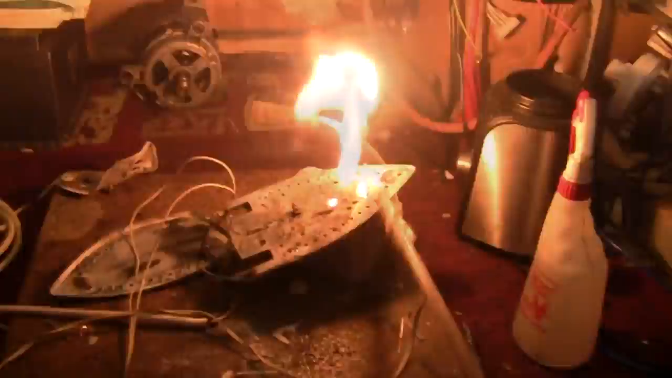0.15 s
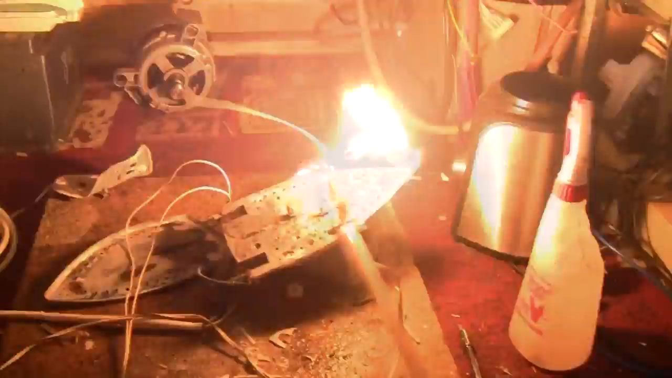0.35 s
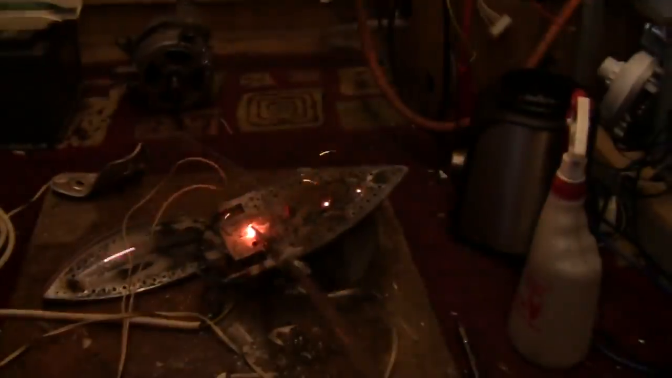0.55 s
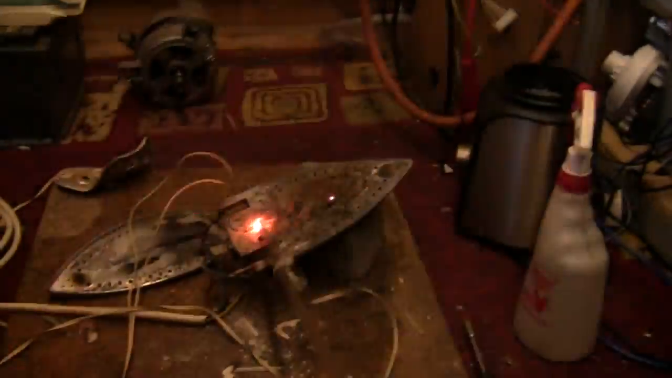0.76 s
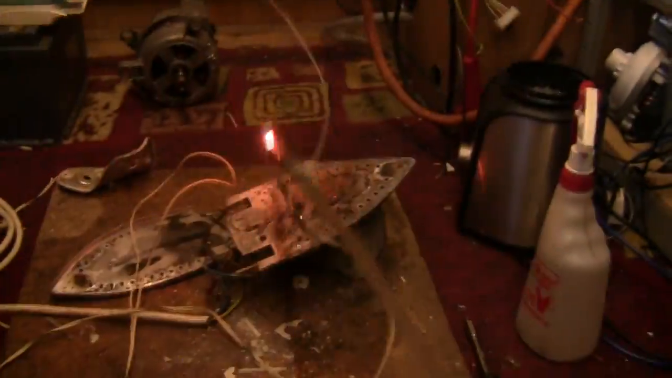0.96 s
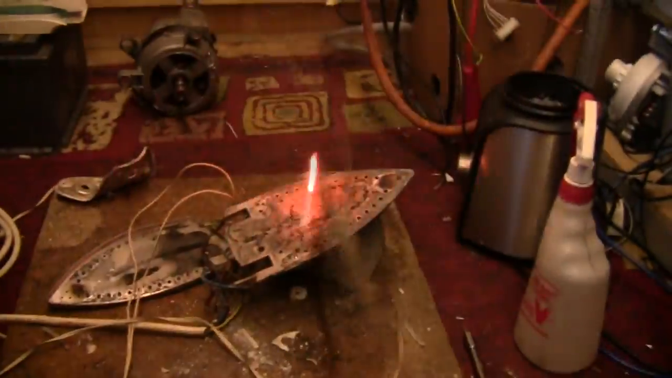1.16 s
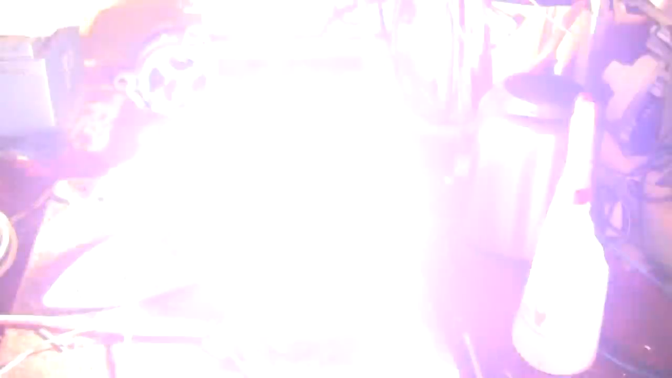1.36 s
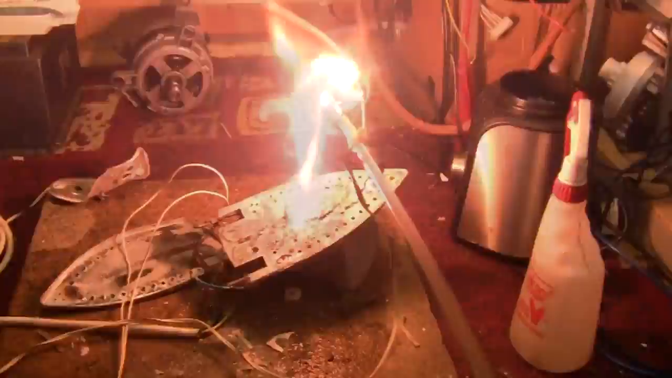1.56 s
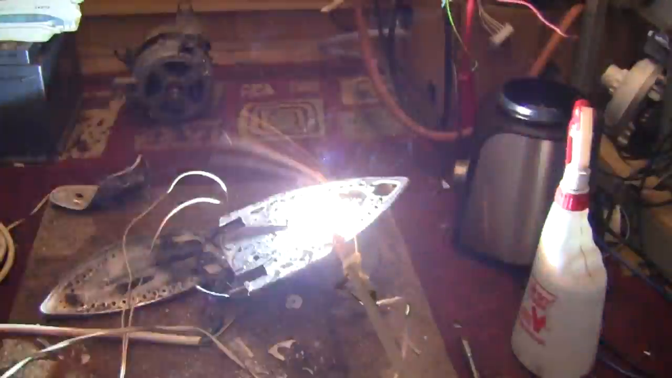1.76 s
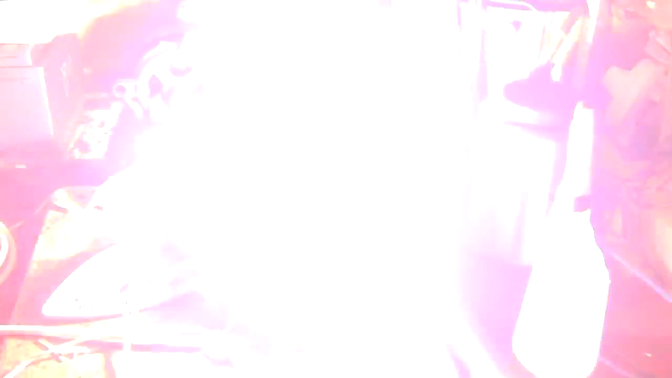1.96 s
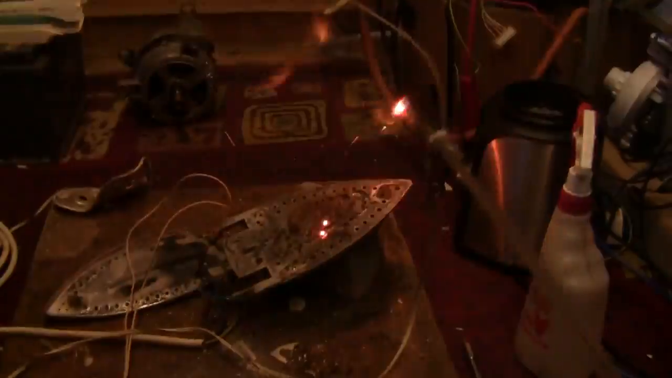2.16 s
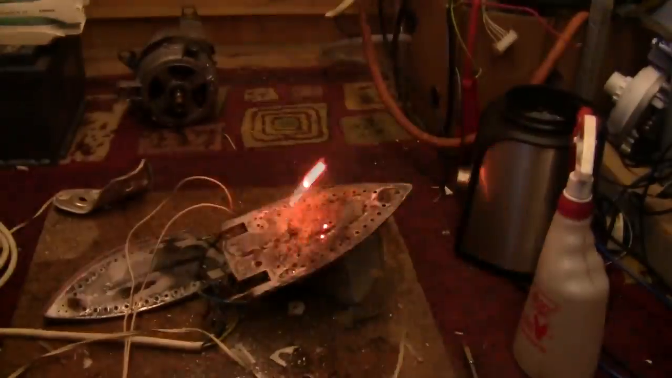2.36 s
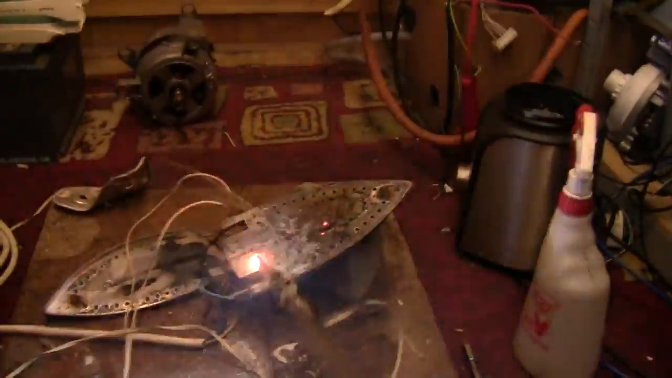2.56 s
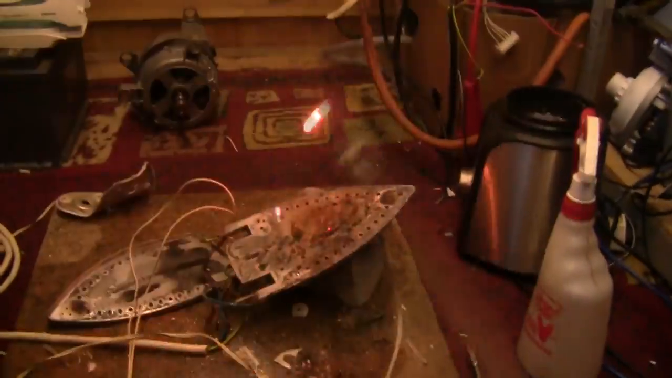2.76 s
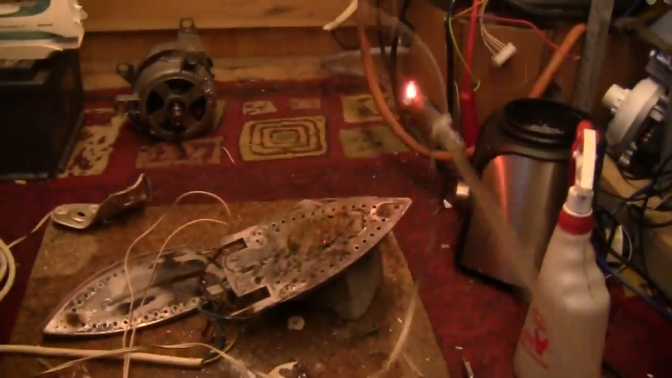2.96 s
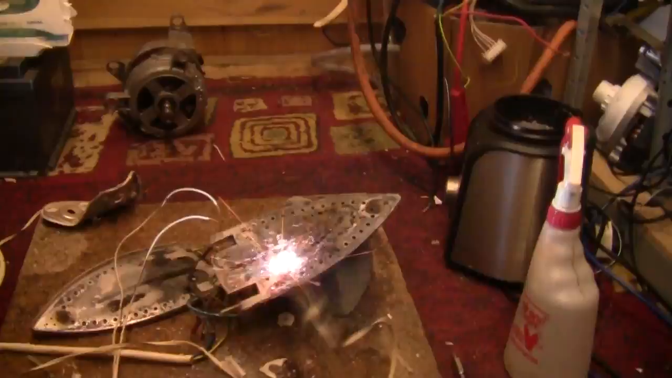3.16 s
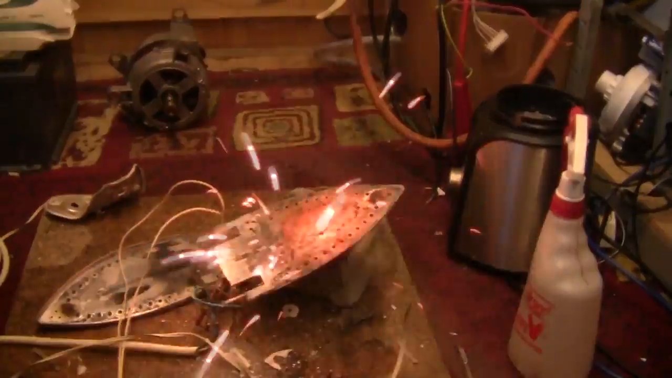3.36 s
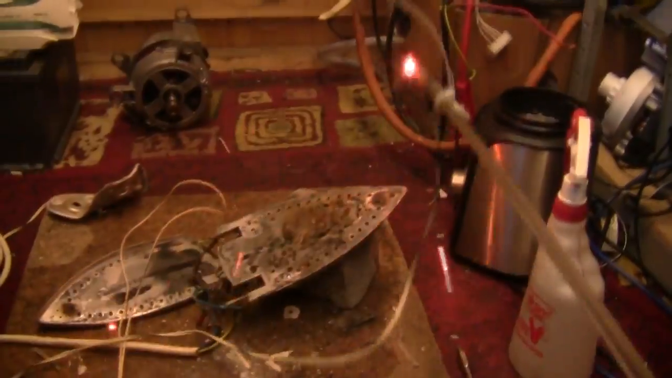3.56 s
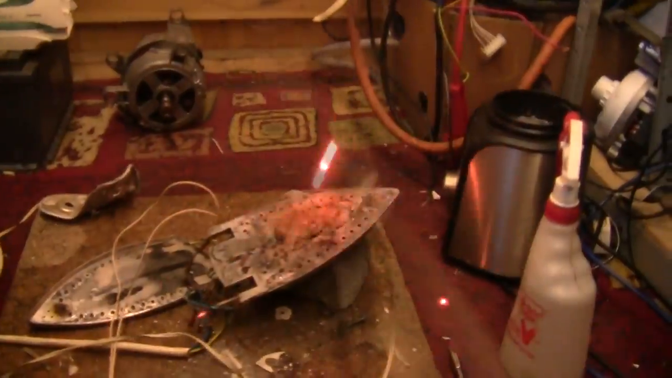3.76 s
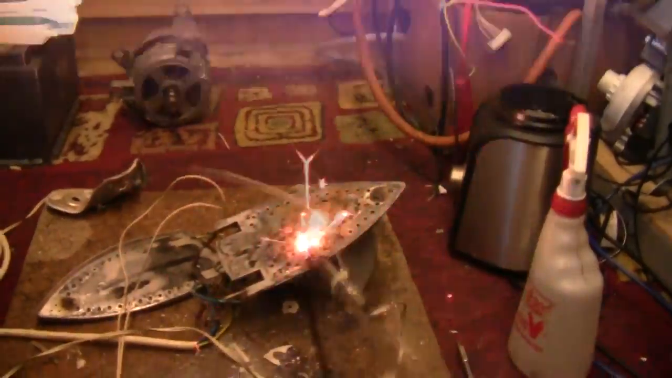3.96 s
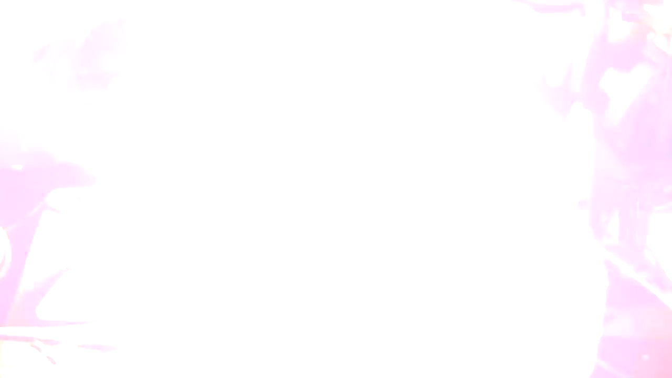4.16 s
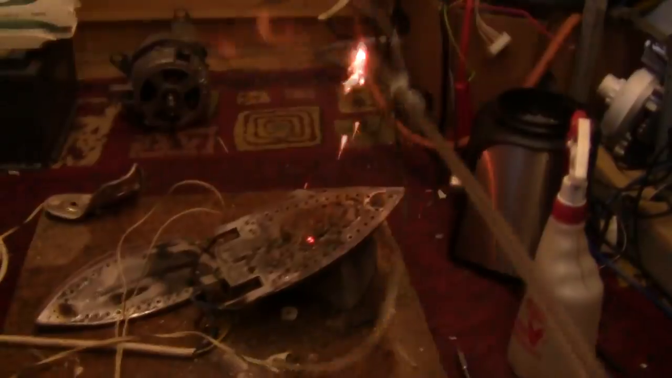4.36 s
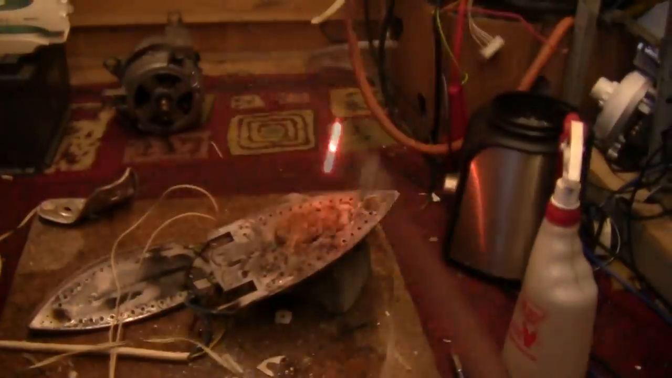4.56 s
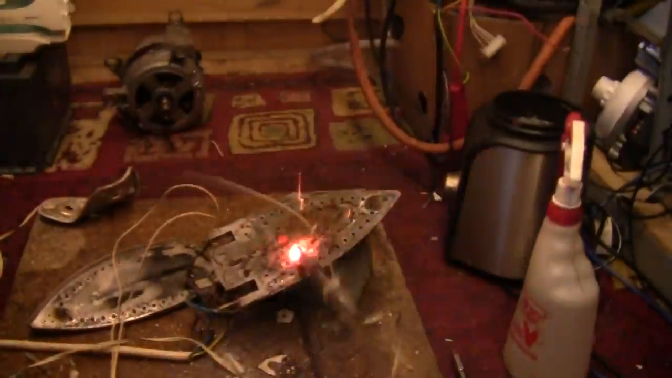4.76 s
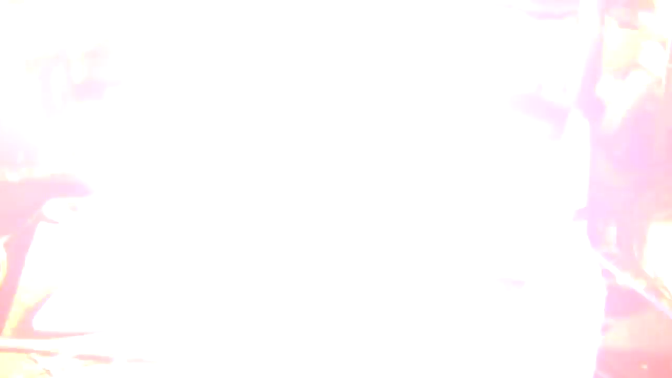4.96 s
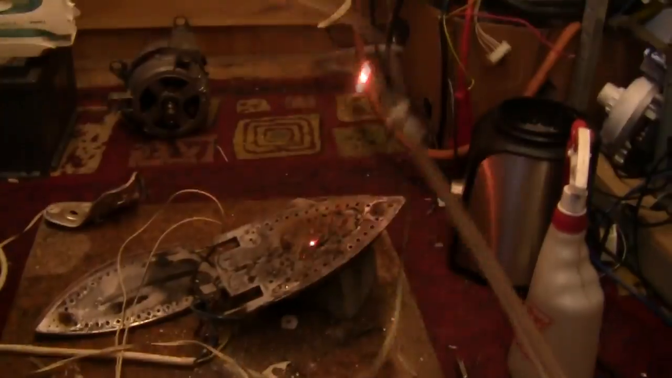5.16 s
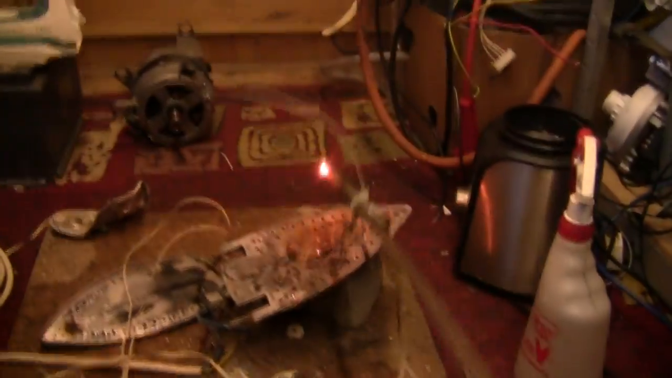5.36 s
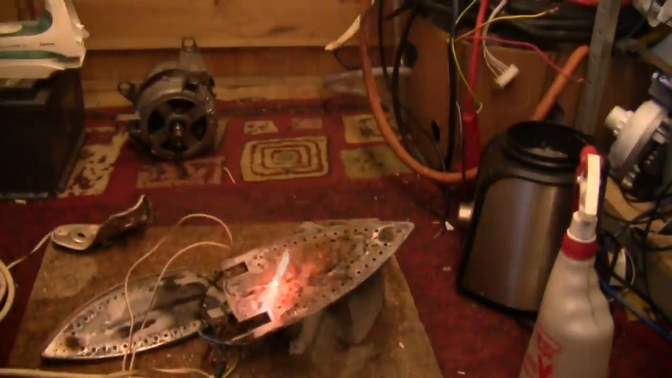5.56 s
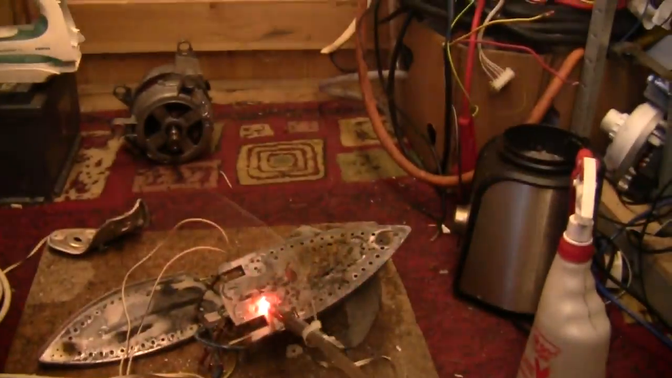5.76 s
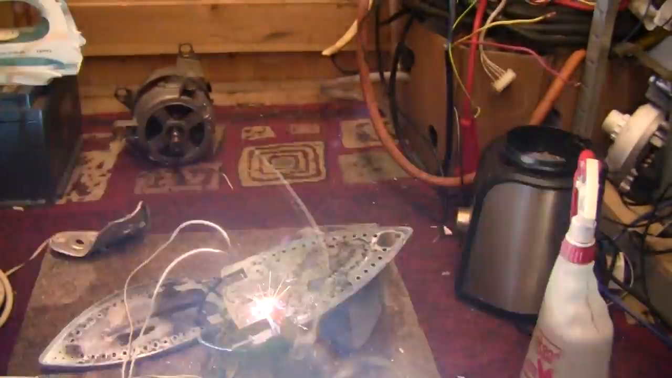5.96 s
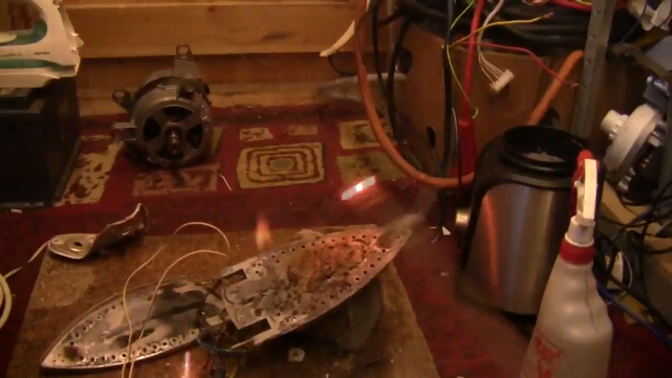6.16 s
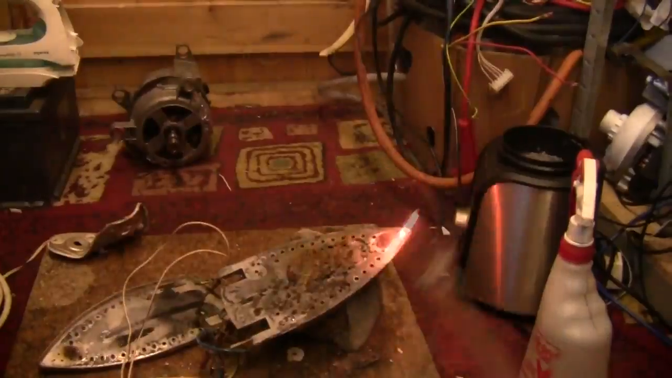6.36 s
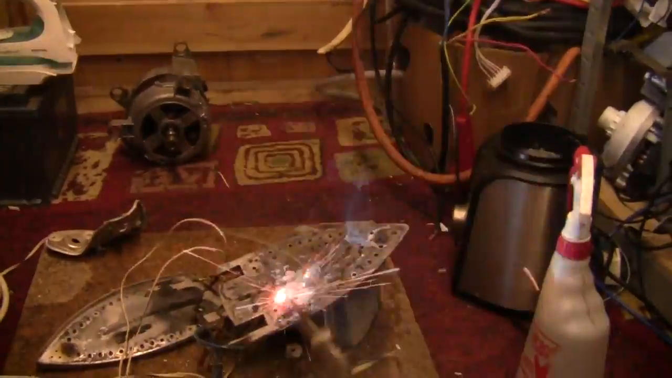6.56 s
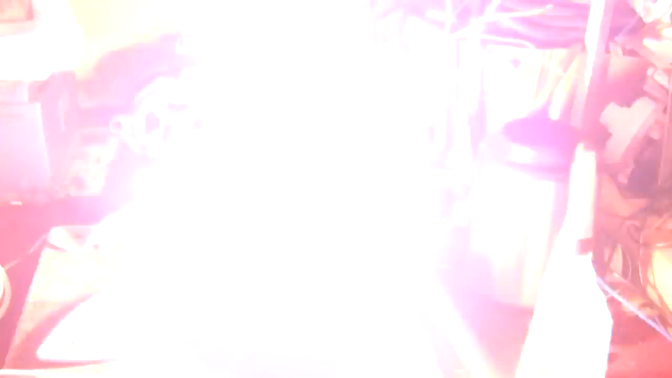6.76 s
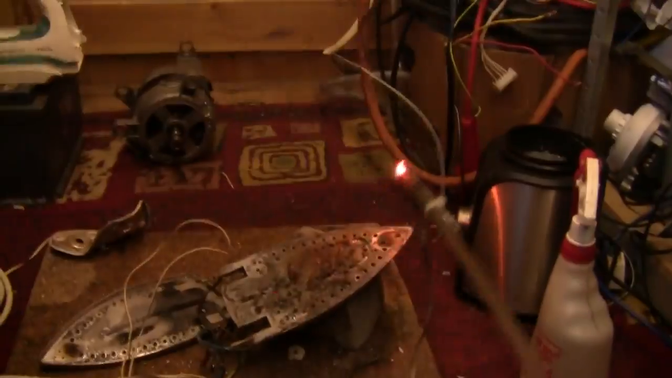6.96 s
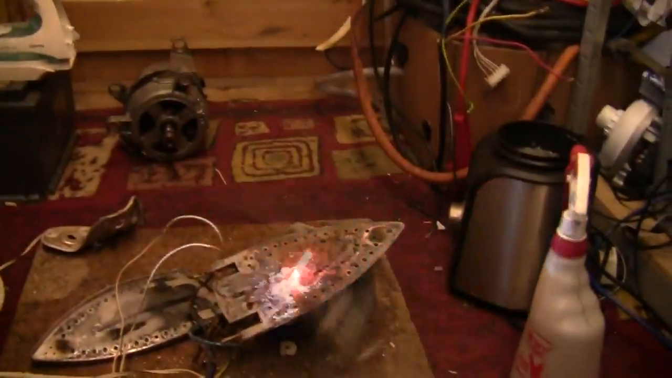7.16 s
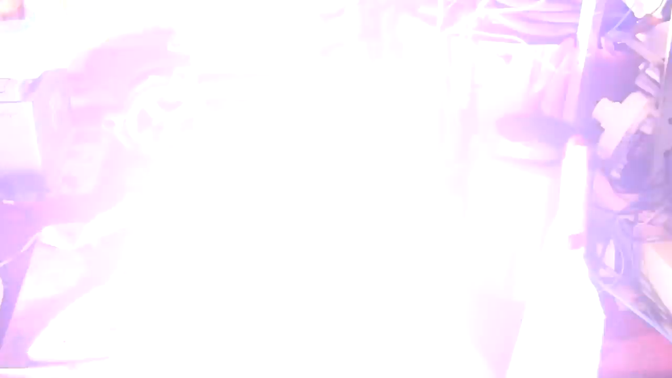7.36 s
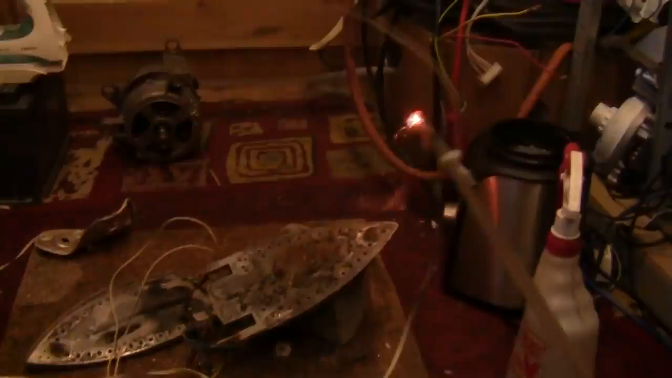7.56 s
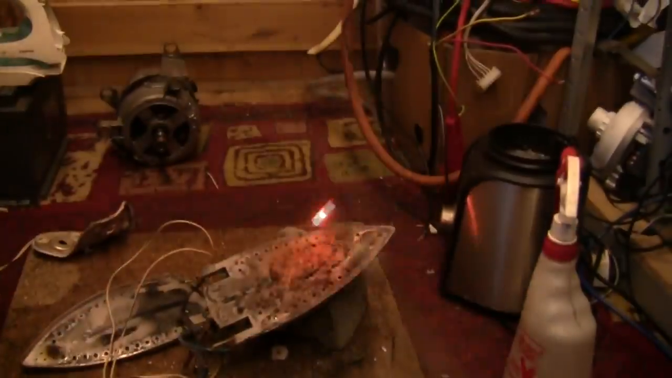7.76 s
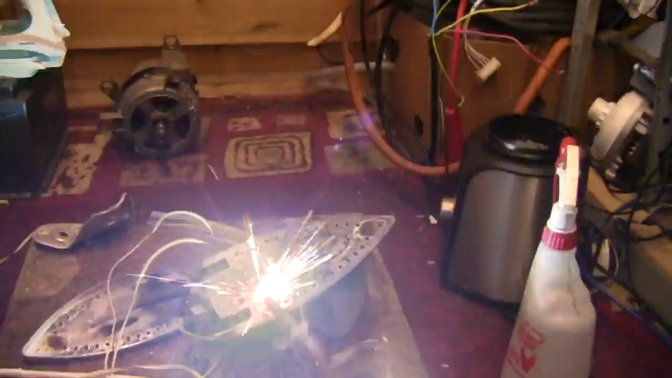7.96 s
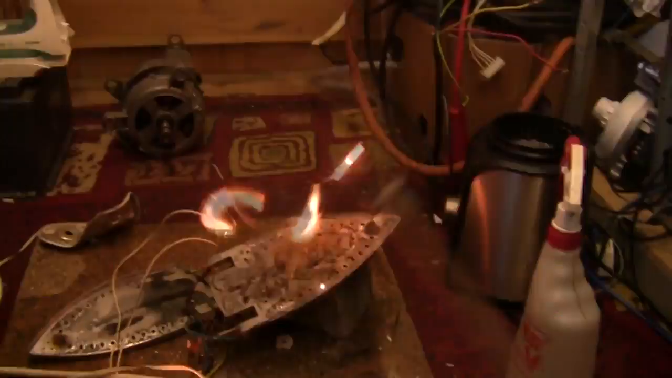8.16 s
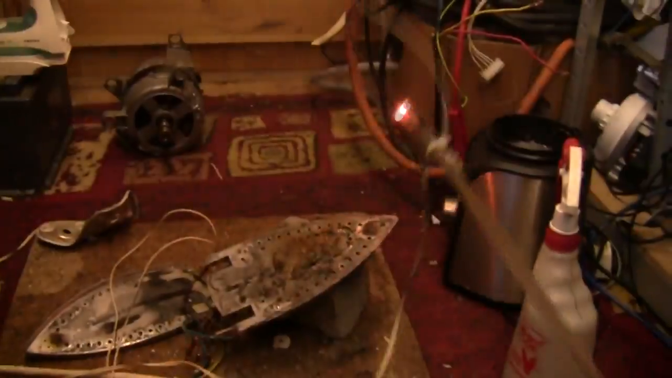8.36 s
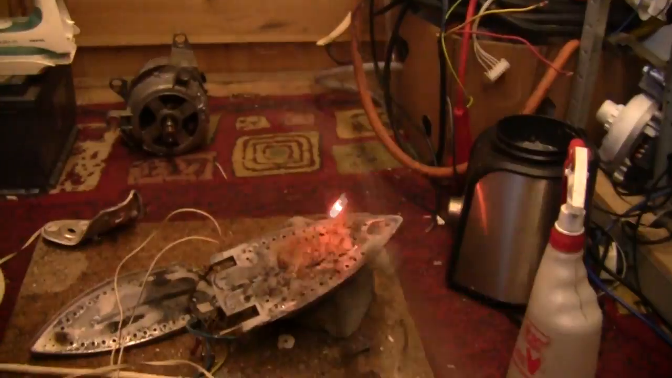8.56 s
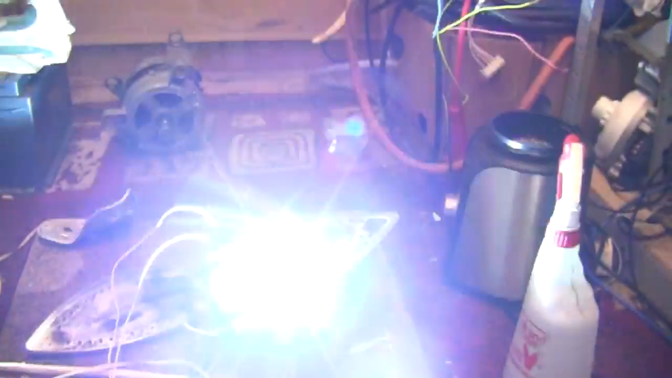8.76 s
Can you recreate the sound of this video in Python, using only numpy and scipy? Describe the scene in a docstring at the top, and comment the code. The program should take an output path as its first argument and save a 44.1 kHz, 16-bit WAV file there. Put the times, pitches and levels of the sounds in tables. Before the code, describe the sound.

Close stereo sound in a small shed with a short dull echo. At 0 seconds a rod clinks on a metal plate and an arc immediately buzzes, hissing and roaring at about 100 hertz, swelling until it snaps; another follows at 0.27. A tap at 0.56 leaves a thin ringing tone, and sparks spit sharply at 0.9. Longer growling arcs come at 1.3 and 1.8, short crackles at 2.55 and 3.25, with bright sizzling between. A long buzz runs from 4 to 4.35, another from 4.8 to 5.1. A bare clink and spit at 5.7 leave a faint tone; brief violent bursts follow at 6.1 and 6.5, then fuller arcs at 6.65, 7.3 and 8.05. A weak tap spits at 8.8. Outside, an engine recedes early, returns from about 4 seconds, revs up around 5 to 7, and drops in pitch with a gear change near 7.7, over a low murmur.

```python
"""In a shed, a live rod taps a metal plate and is drawn away, heard by a small stereo microphone a metre off.
The plate clinks as a sum of decaying modes; metal spits and sizzles as shaped noise, with tiny sharp sparks.
The stretching arc hums at twice the mains frequency, its gas hissing and roaring, until it snaps.
Outside, a vehicle built from firing orders and tyre noise pulls away over a murmur."""
import sys
import numpy as np
from scipy import signal
from scipy.fft import rfft, irfft, next_fast_len
from scipy.io import wavfile
from scipy.ndimage import uniform_filter1d

SR = 44100
rng = np.random.default_rng(int(sys.argv[2]) if len(sys.argv) > 2 else 0)


def gain_from_decibels(decibels):
    """Convert decibel values to linear amplitude factors."""
    exponent = np.asarray(decibels, float) / 20
    return 10 ** exponent


def materialize(psi):
    """Save the field psi as 16-bit PCM at rate SR to the path in sys.argv[1].

    A 1-D psi becomes a single channel; in a 2-D psi each row is a channel.
    """
    bounded = np.clip(np.atleast_2d(psi).T, -1, 1)
    quanta = np.round(bounded * 32767).astype(np.int16)
    wavfile.write(sys.argv[1], SR, quanta)


N = 388521


def track(rows):
    """Linear interpolation: the columns of a curve at every sample."""
    s, *columns = np.transpose(rows)
    return [np.interp(np.arange(N) / SR, s, c) for c in columns]


def colour(x, points, lag=0.):
    """Linear filtering: a spectrum weighted by (Hz, dB) points, with an optional delay in seconds."""
    size = next_fast_len(x.shape[-1])
    hz = np.arange(size // 2 + 1) * SR / size
    at, db = np.transpose(points)
    gain = gain_from_decibels(np.interp(np.log(hz + 1), np.log(at + 1), db))
    delay = np.exp(-2j * np.pi * hz * lag)
    return irfft(rfft(x, size) * gain * delay, size)[..., :x.shape[-1]]


def noise(points, channels=1):
    """Spectral shaping: white noise coloured by (Hz, dB) points and brought to rms 1."""
    x = colour(rng.standard_normal((channels, N)), points)
    return x / x.std()


def walk(rate):
    """Slow random modulation: levels held 1 / rate seconds and smoothed twice; spread near 1."""
    k = int(SR / rate)
    held = np.repeat(rng.standard_normal(N // k + 1), k)
    return 1.4 * uniform_filter1d(uniform_filter1d(held, k), k)[:N]


def decay(t, t60):
    """Exponential decay: 60 dB down after t60 seconds."""
    return np.exp(-np.log(1000) * t / t60)


def add(out, s, piece):
    """Superposition: mix a piece in from time s."""
    i = max(int(s * SR), 0)
    out[i:i + len(piece)] += piece[:N - i]


# Spectrum of the outdoor murmur. Each row: frequency in Hz, relative level in dB.
MURMUR_SPECTRUM = [(20, -40), (33, -29), (66, -23), (113, -0.5), (160, -20), (234, -9), (340, -22.5),
                   (1000, -29.5), (3100, -42), (8600, -55.5), (15600, -68)]


def murmur():
    """Coherence falling with frequency: outdoor murmur, alike in both ports in the bass, less so above."""
    mid, side = noise(MURMUR_SPECTRUM, channels=2)
    side = colour(side, [(60, -33.5), (500, -2.5), (3000, -0.5), (10000, 1.5)])
    return gain_from_decibels(-45.5 + 1.2 * walk(12)) * (mid + side * np.array([[1], [-1]]))


# Sizzle of glowing metal, strongest between arcs. Each row: time in seconds, level in dB.
SIZZLE_LEVEL = [(0, -59.5), (.6, -50), (.9, -52), (1.28, -62), (2.33, -62.5), (2.4, -50), (2.85, -51.5),
                (3.05, -58.5), (3.25, -65), (8.8, -74)]


def sizzle():
    """Amplitude-modulated noise: the flickering bright sizzle of hot metal."""
    bright = noise([(1500, 11), (4000, 1.5), (6100, 3.5), (7500, 2.5), (10000, 5.5), (12500, -7.5), (16000, -23.5)])[0]
    return bright * gain_from_decibels(track(SIZZLE_LEVEL)[0] + 1.4 * walk(70))


# The vehicle's course. Each row: time in seconds, firing rate in Hz, level in dB.
VEHICLE = [(0, 43, -40), (1.2, 42.86, -49.5), (2.4, 38.3, -63.5), (3.5, 36.46, -60.5), (4.2, 36.22, -47),
           (4.6, 37.76, -46), (5.4, 42.64, -42), (5.8, 44.72, -38), (6.6, 51.03, -43), (7.2, 52.8, -44.5),
           (7.5, 53.8, -49.5), (7.75, 40.23, -62), (8.8, 40, -53.5)]
# Firing orders. Each row: multiple of the firing rate, level in dB.
FIRING_ORDERS = [(1, -1), (2, -1), (3, -3.5), (4, -8.5), (5, -16)]
# Exhaust resonance. Each row: frequency in Hz, gain in dB.
EXHAUST_GAIN = [(34, -2), (55, -16.5), (75, -7), (90, -1), (105, 5.5), (130, 0.5), (150, -9.5), (280, -5.5)]


def engine():
    """Harmonic synthesis: wavering firing orders as the vehicle speeds up and changes gear; tyres swell with it."""
    hz, level_db = track(VEHICLE)
    phase = 2 * np.pi * np.cumsum(hz * (1 + 0.0049 * walk(12))) / SR
    at, gain_db = np.transpose(EXHAUST_GAIN)
    orders = np.zeros(N)
    for k, db in FIRING_ORDERS:
        order_db = db + np.interp(k * hz, at, gain_db) + 1.8 * walk(10)
        orders += gain_from_decibels(order_db) * np.sin(k * phase)
    tyres = gain_from_decibels(-9.5) * noise([(100, -14.5), (250, -1.0), (1200, -8.5), (3000, -23.5), (9000, -50.5)])[0]
    return gain_from_decibels(level_db) * (np.sqrt(2) * orders + tyres)


def hum_phase():
    """Joule heating peaks twice a mains cycle: the hum's phase in radians, wandering slightly."""
    hum_hz, start_s = 99.88, .0065
    return 2 * np.pi * hum_hz * (np.arange(N) / SR - start_s) + .035 * walk(30)


# Spectrum of hiss, shared by arcs and spits. Each row: frequency in Hz, relative level in dB.
HISS_SPECTRUM = [(1180, -14), (2000, -7.5), (3240, -9), (3710, -5), (4190, -7.5), (5610, -11.5), (8400, -7),
                 (12300, -20), (15600, -41)]
# Spectrum of the lower roar, shared likewise. Each row: frequency in Hz, relative level in dB.
ROAR_SPECTRUM = [(150, -8.5), (300, -10.5), (600, -8), (1500, -16.5), (4000, -28.5), (8000, -48)]


def gas_noise():
    """Turbulence as coloured noise: a hiss made grainy by droplets, and a steady lower roar."""
    grain_db = 4 * np.clip(walk(450), -3, 1.6)
    return noise(HISS_SPECTRUM)[0] * gain_from_decibels(grain_db), noise(ROAR_SPECTRUM)[0]


# Gas in each arc, from strike to snap. Each row: strike in seconds, duration in seconds, hiss level in dB,
# hiss sag in dB per second, roar level in dB.
ARC_GAS = [(0.0, 0.26, -51, 27, -42.5), (0.269, 0.18, -49.5, 35.5, -36), (0.887, 0.083, -50.5, 119.5, -41),
           (1.297, 0.36, -43, 20, -40.5), (1.7973, .4, -43.5, 12, -41), (2.538, .06, -44, 251.5, -70.5),
           (2.667, 0.069, -34.5, 204.5, -38), (3.256, 0.17, -46, 6.5, -59.5), (3.9663, .372, -39, 31, -40),
           (4.78, 0.081, -41.5, 46, -68), (4.888, 0.22, -44.5, 47, -39.5), (6.074, 0.1, -34, 152, -40),
           (6.51, 0.077, -55.5, 98, -42), (6.6456, 0.26, -41, 23.5, -38), (7.284, 0.28, -42, 18.5, -38.5),
           (8.043, 0.18, -38, 62, -38.5)]


def burning_gas():
    """Envelope shaping: the hiss sags as the arc burns, the roar holds; both fall fast from the snap."""
    rise_s, fall_db_per_s = .006, 902
    hiss, roar = np.zeros(N), np.zeros(N)
    for s, lasts, hiss_db, sag, roar_db in ARC_GAS:
        t = np.arange(int((lasts + .1) * SR)) / SR
        gate = np.minimum(t / rise_s, 1) * gain_from_decibels(-fall_db_per_s * np.maximum(t - lasts, 0))
        add(hiss, s, gate * gain_from_decibels(hiss_db - sag * t))
        add(roar, s, gate * gain_from_decibels(roar_db))
    return hiss, roar


def gas(hiss, roar, phase):
    """Periodic heating: the roar puffs each half mains cycle; restrikes crack unevenly, harder on one polarity."""
    restrike_turn, weak_half_db = .4, -7  # share of a hum period; the weaker polarity
    hiss_gain, roar_gain = burning_gas()
    puff = np.cos(phase - .4)
    half = phase / (2 * np.pi) + 2 - restrike_turn  # half mains cycles, kept positive
    which = half.astype(int)
    size_db = 4.3 * np.minimum(rng.exponential(size=N // 400), 2) - 0.6
    crack = gain_from_decibels(size_db[which] + weak_half_db * (which % 2)) * np.exp(-(half % 1) / 0.18)
    roaring = roar_gain * gain_from_decibels(0.97 * puff + 1.5 * walk(60)) * roar
    hissing = hiss_gain * gain_from_decibels(1.1 * walk(82)) * (1 + crack) * hiss
    return roaring + hissing


# Rod on plate. Each row: time in seconds, level in dB, share of the modes' ring time, tilt of the modes
# in dB per octave, frequency in Hz favoured by the spot struck.
ROD_TAPS = [(.0004, 0.5, 0.26, 4.5, 2600), (0.2692, -0.5, 0.45, 2, 1900), (0.5572, -2.5, 0.52, -1, 2580),
            (1.2879, -2.5, 0.86, 4, 2600), (1.7982, -6, 0.76, -3, 2280), (1.9119, -15.5, 0.63, -1.5, 2420),
            (2.5473, -9.5, 0.46, -3, 3800), (3.254, -8, 0.94, 0.5, 2610), (3.9688, -10.5, 0.61, 0.5, 3490),
            (4.7656, -13.5, 0.28, 4.5, 1330), (5.687, -2.5, 0.63, 3, 1280), (6.509, -10, 0.81, 0, 3450),
            (7.2868, -10, 0.36, 3, 2550), (8.031, -10.5, 0.72, -1, 2688), (8.806, -24, .9, -7, 1280)]
# Modes of the plate. Each row: frequency in Hz, level in dB, 60 dB decay time in seconds.
PLATE_MODES = [(190, -10, .12), (512, -11, .18), (548, -10, .12), (765, -13, .1), (870, -14, .14),
               (1170, -12, .1), (1282, -10, .2), (1519, -9, .14), (1656, -7, .12), (1762, -6, .11),
               (1890, -2, .17), (2296, -4, .1), (2530, -7, .16), (2586, -5, .17), (2640, -10, .1),
               (2855, -9, .12), (3025, -11, .14), (3163, -7, .14), (3236, -7, .14), (3455, -3, .13),
               (3720, -11, .1), (3890, -8, .11), (4400, -11, .09), (4769, -13, .1), (6110, -15, .09),
               (6390, -19, .14), (8230, -18, .1)]


def taps():
    """Modal synthesis: each tap rings the plate's modes in its own mix, over a short dull knock."""
    out, t = np.zeros(N), np.arange(SR // 4) / SR
    hz, db, t60 = np.transpose(PLATE_MODES)[:, :, None]
    chance = rng.standard_normal((len(ROD_TAPS), 3, len(PLATE_MODES), 1))
    knock = noise([(100, -2.5), (300, -2), (1500, -4.0), (4000, -21.0), (9000, -17.5), (16000, -44)])[0]
    for (s, level_db, share, tilt_db, spot_hz), (mix, bend, turn) in zip(ROD_TAPS, chance):
        tilt = tilt_db * np.log2(hz / 2000)
        favour = 5.5 * np.exp(-(np.log2(hz / spot_hz) / .11) ** 2)
        size = gain_from_decibels(db + 2.5 * mix + tilt + favour)
        bent_hz = hz * (1 + 0.0023 * bend)
        modes = size * decay(t, t60 * share) * np.sin(2 * np.pi * bent_hz * t + 3 * turn)
        ring = modes.sum(axis=0)
        i = int(s * SR / 2)  # a different stretch of noise for each knock
        body = gain_from_decibels(-12) * knock[i:i + len(t)] * decay(t, 0.037)
        add(out, s, gain_from_decibels(level_db) * (gain_from_decibels(-14) * ring + body) * np.minimum(t / 0.0005, 1))
    return out


# The rod drawn away until the arc snaps. Each row: start in seconds, duration in seconds,
# speed in metres per second, level in dB.
ROD_DRAWS = [(0.038, 0.2, 1.43, -2), (0.334, 0.11, 1.7, -1.5), (1.362, 0.29, 0.79, -0.5),
             (1.962, 0.23, 1.1, -1.5), (2.675, 0.066, 1, -2.5), (3.372, 0.049, 0.61, 0.),
             (4.108, .22, 0.93, -1.5), (4.863, 0.24, 0.82, -1), (6.092, .07, 1.7, -0.5),
             (6.525, 0.042, 0.55, 5.5), (6.713, 0.18, 1.22, 0.5), (7.369, 0.21, 1.3, -1.5),
             (8.079, 0.14, 1.2, 0.)]
# A longer arc hums louder and rounder. Each row: length in metres, hum in dB, second harmonic in dB.
ARC_STRETCH = [(0, -43, -51), (.04, -33.5, -30.5), (.1, -22, -24), (.15, -18, -24.5), (.2, -16, -30.5),
               (.3, -14.5, -22.5)]
# Decay after the snap. Each row: time since in seconds, change of hum in dB, change of second harmonic in dB.
AFTER_SNAP = [(0, 0, -0.5), (.03, -10.5, -21), (0.091, -21, -28), (.2, -60.5, -67)]


def drawn():
    """Source level by geometry: arc length sets hum and second harmonic in dB; both die after the snap."""
    t, out = np.arange(N) / SR, np.full((2, N), -90.)
    length, *grown = np.transpose(ARC_STRETCH)
    since, *died = np.transpose(AFTER_SNAP)
    for s, lasts, speed, db in ROD_DRAWS:
        on = slice(int(s * SR), int((s + lasts + since[-1]) * SR))
        age = t[on] - s
        for row, up, down in zip(range(2), grown, died):
            growth_db = np.interp(speed * np.minimum(age, lasts), length, up)
            death_db = np.interp(age - lasts, since, down)
            out[row, on] = np.maximum(out[row, on], db + growth_db + death_db)
    return out


# Hum overtones from the third. Each row: multiple of the hum, level in dB against the second.
HUM_OVERTONES = [(3, -6.5), (4, -9.5), (5, -15.5), (6, -23), (7, -20), (10, -32), (24, -35)]


def hum(phase):
    """Thermoacoustic harmonics: the column heats twice a mains cycle; a long arc adds a second, later edge."""
    edge_lag, late_lag = 1.2, 2.2  # radians
    hum_db, second_db = drawn()
    burning = hum_db > -70
    turn = phase[burning]
    multiple, db = np.transpose(HUM_OVERTONES)
    edge, late, out = np.sin(2 * turn), 0, np.zeros(N)
    waver = walk(25)
    for k in range(3, 21):
        # each overtone wavers in its own time
        size = gain_from_decibels(np.interp(k, multiple, db) + 1.3 * np.roll(waver, k * SR // 3)[burning])
        edge += size * np.sin(k * turn - edge_lag)
        if k > 3:
            late += size * np.sin(k * (turn - late_lag) - edge_lag)
    # the late edge grows faster than the hum itself
    late *= gain_from_decibels(1.434 * hum_db[burning] - 1.0)
    out[burning] = gain_from_decibels(hum_db[burning]) * np.sin(turn) + gain_from_decibels(second_db[burning]) * edge + late
    return np.sqrt(2) * out


def ticks():
    """Random point process: faint spits from cooling beads, as rows like those of the molten spits."""
    per_s, faintest_db = 6, -48
    when, size = rng.random((int(per_s * N / SR), 2)).T
    return [(s * N / SR, faintest_db - 3.5 * np.log(1 - u), -20, .03) for s, u in zip(when, size)]


# Molten metal spits. Each row: time in seconds, level in dB, low part against it in dB,
# 60 dB decay time in seconds (held to 0.2 at most).
MOLTEN_SPITS = [(0.047, -2, -31.5, 0.063), (0.0857, -17.5, -28.5, 0.1), (0.196, -10.5, 8, 0.081),
                (0.3357, -12.5, -35, 0.15), (0.5564, -7, -20.5, 0.13), (0.898, -17.5, -14, 0.07),
                (0.9093, -9, -8.5, 0.12), (0.9112, -6, 8, 0.06), (1.2916, 1, -29, 0.057),
                (1.511, -22, -19, 0.054), (1.5531, -16.5, -27, 0.03), (1.7952, -11, -25, 0.059),
                (1.8425, -27.5, -20, 0.022), (1.911, -17, -18, 0.039), (1.9618, -9.5, -39, 0.095),
                (2.556, 2, -21, 0.06), (2.5614, -8.5, -20.5, 0.072), (2.6743, -17.5, -7.5, 0.03),
                (2.6823, -9.5, -2.5, 0.28), (2.7322, -13.5, 1.5, 0.066), (3.017, -28.5, -17.5, 0.062),
                (3.157, -35, -18, 0.026), (3.253, -5.5, -18, 0.087), (3.293, -12.5, -1, 0.092),
                (3.3114, -5, -12, 0.23), (3.3364, -14.5, -12, 0.04), (3.3922, -2, 3, 0.11),
                (3.401, -5, -15, 0.068), (3.968, -17, -24, 0.034), (4.0472, -5.5, -7.5, 0.06),
                (4.104, -8, 0, 0.29), (4.136, -16, -4, 0.021), (4.236, -19.5, -12, 0.082),
                (4.2748, -20.5, -22, 0.031), (4.6633, -39, -8, 0.055), (4.713, -38, -7, 0.078),
                (4.7711, -9, 9.5, 0.078), (4.814, -10, -31, 0.058), (4.8926, -15.5, -28, 0.037),
                (4.9048, -13.5, 6, 0.1), (5.688, -1.5, -76, 0.057), (6.067, -5.5, -24, 0.07),
                (6.08, -27.5, -20, 0.04), (6.0887, -8, 6, 0.21), (6.4392, -34, -12, 0.046),
                (6.5092, -9.5, -18.5, 0.039), (6.5136, -0.5, -28, 0.15), (6.6563, -5.5, -2, 0.052),
                (6.7064, -7, -22, 0.11), (6.7176, -12.5, -22, 0.14), (6.7382, -9, -4.5, 0.056),
                (6.8062, -14, 4, 0.037), (7.286, -9.5, -18, 0.086), (7.38, -13, -14.5, 0.045),
                (7.3993, -16, -10, 0.047), (7.4593, -16, -27, 0.034), (8.0328, -5.5, -26.5, 0.068),
                (8.077, -8, -30, 0.12), (8.1667, -23, 4.5, 0.17), (8.2164, -16, -5.5, 0.027),
                (8.4256, -38.5, -13, 0.1), (8.805, -10, -23, 0.11)]


def spits(hiss, roar):
    """Noise bursts: a spray of hiss with lower body; brief ones snap harder, long ones swell in more slowly."""
    high, low, t = np.zeros(N), np.zeros(N), np.arange(SR // 4) / SR
    for s, level_db, low_db, t60 in MOLTEN_SPITS + ticks():
        t60 = np.clip(t60, .004, .2)
        spray = decay(t, t60) * np.minimum(t / (0.029 * t60), 1)
        snap_size = gain_from_decibels(-11) * min(0.045 / t60, 1.5) ** 0.9
        snap = snap_size * np.exp(-t / 0.0012) * np.minimum(t / .0003, 1)
        add(high, s, gain_from_decibels(level_db) * (gain_from_decibels(-18.0) * spray + snap))
        add(low, s, gain_from_decibels(level_db + low_db - 23.0) * spray)
    return high * hiss + low * roar


# Sharp sparks. Each row: time in seconds, level in dB.
SHARP_SPARKS = [(0.0477, -6.5), (0.3377, -11.5), (0.914, 5), (1.9608, 0.5), (2.5541, -4.5), (2.5623, -4.5),
                (3.2969, -10), (4.0467, -7.5), (4.1051, -9), (4.8141, -9), (4.847, -11.5), (4.891, -14.5),
                (6.0868, -7), (6.5163, 1), (6.7194, -6.5)]


def sparks():
    """Weak shock wave: a tiny N-shaped pressure step with a brief fizz behind it."""
    step_s, gain_db = 0.000072, 2.5
    out, t = np.zeros(N), np.arange(SR // 100) / SR
    step = np.where(t < step_s, 1 - 2 * t / step_s, 0)
    for (s, level_db), white in zip(SHARP_SPARKS, rng.standard_normal((len(SHARP_SPARKS), len(t)))):
        fizz = gain_from_decibels(-17) * np.diff(white, prepend=0) * np.exp(-t / 0.00043)
        add(out, s, gain_from_decibels(level_db + gain_db) * (step + fizz))
    return colour(out, [(1000, -5), (8000, -2.5), (11500, -4.5), (16000, -28)])


# Thin tones after two taps. Each row: start in seconds, end in seconds, frequency in Hz, rms level in dB.
LINGERING_TONES = [(.62, .9, 2580, -61), (5.74, 6.07, 2299, -58)]


def lingering():
    """Sinusoid under a tapered envelope: a thin, wavering tone lingers after two of the taps."""
    out = np.zeros(N)
    for start, end, tone_hz, tone_db in LINGERING_TONES:
        t = np.arange(int((end - start) * SR)) / SR
        level = gain_from_decibels(tone_db) * gain_from_decibels(1.07 * walk(58)[:len(t)]) * signal.windows.tukey(len(t), .2)
        add(out, start, np.sqrt(2) * level * np.sin(2 * np.pi * tone_hz * t))
    return out


def shed(x):
    """Diffuse reverberation by convolution: a dull tail mostly alike at both ports, a brief bright one that differs."""
    t = np.arange(SR // 2) / SR
    tail = rng.standard_normal((4, len(t))) * np.minimum(t / 0.0037, 1)
    dull = tail[0] + .3 * tail[1] * np.array([[1], [-1]])
    dull = colour(dull, [(50, -15), (300, 3), (2500, -4.0), (6000, -9), (16000, -35.5)])
    bright = colour(tail[2:], [(500, -22.0), (3000, 0), (8000, 4.5), (13000, 3)])
    echo = dull * decay(t, 0.25) + 0.5 * bright * decay(t, 0.16)
    echo /= np.sqrt((echo ** 2).sum() / 2)
    return signal.fftconvolve(x[None], echo, axes=1)[:, :N]


def scene():
    """Superposition: arc, taps, sparks and spits with the shed's answer, over engine and murmur."""
    hiss, roar = gas_noise()
    phase = hum_phase()
    near = sizzle() + gas(hiss, roar, phase) + taps() + spits(hiss, roar) + sparks() + lingering()
    # the near sounds carry no deep bass
    near = signal.sosfilt(signal.butter(2, 90, "high", fs=SR, output="sos"), near)
    return murmur() + engine() + near + hum(phase) + gain_from_decibels(-7) * shed(near)


def band_limit(x):
    """A steep low-pass at the top of the band."""
    return signal.sosfilt(signal.butter(12, 15740, fs=SR, output="sos"), x)


# Balance of the microphone's ports. Each row: frequency in Hz, left against right in dB.
PORT_BALANCE = [(60, -2), (160, 0.17), (300, 1.8), (700, 1), (1300, 0.5), (2400, -1), (4400, -1.5),
                (8000, -5), (15000, -14)]


def record(dry):
    """Interaural-like differences and saturation: the left port is shaded in treble and later; peaks round off."""
    hz, db = np.transpose(PORT_BALANCE)
    left = colour(dry[0], np.transpose([hz, db / 2]), lag=1e-5)
    right = colour(dry[1], np.transpose([hz, -db / 2]))
    mix = np.tanh(0.64 * np.array([left, right])) / 0.55
    return band_limit(mix)


dry = scene()
out = record(dry)
materialize(out)
```